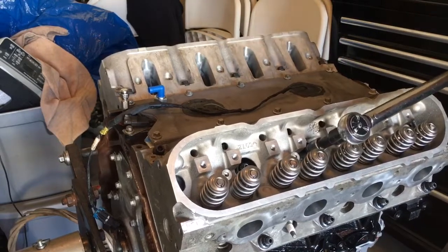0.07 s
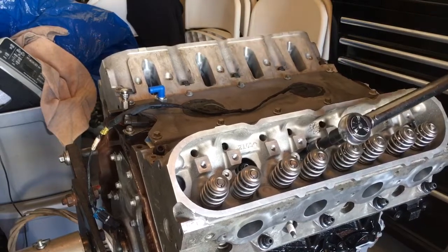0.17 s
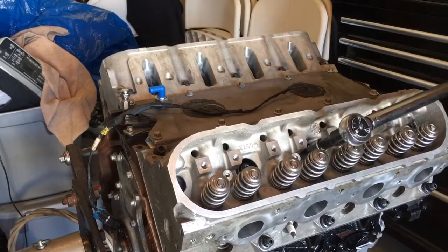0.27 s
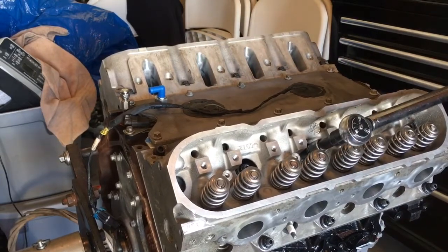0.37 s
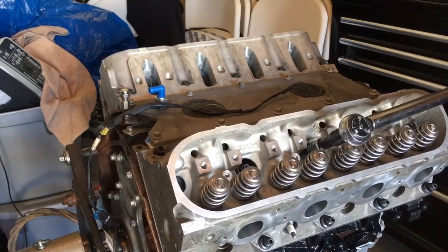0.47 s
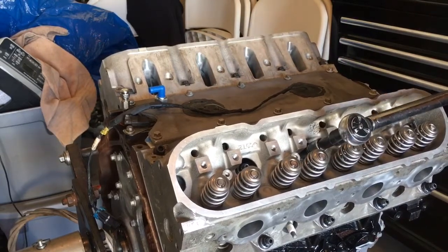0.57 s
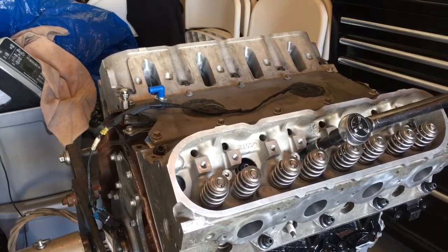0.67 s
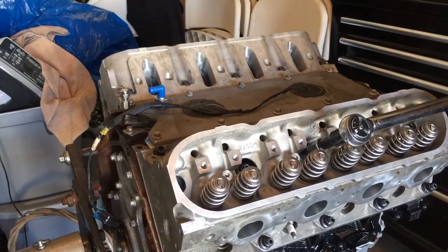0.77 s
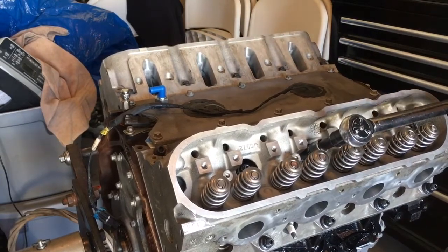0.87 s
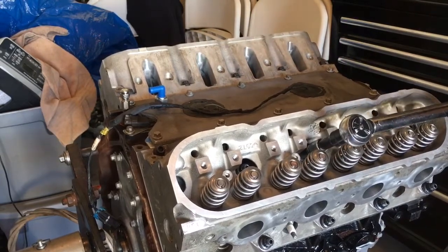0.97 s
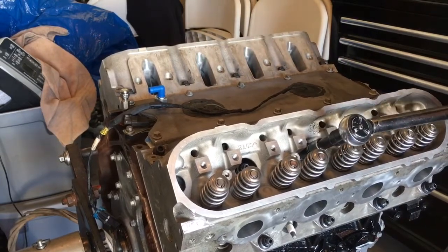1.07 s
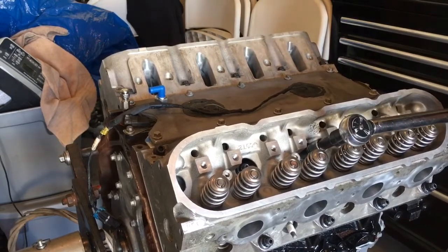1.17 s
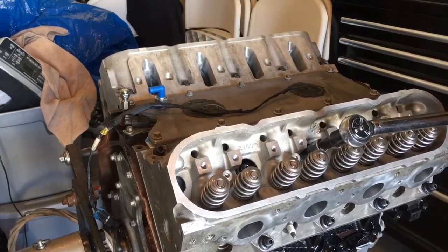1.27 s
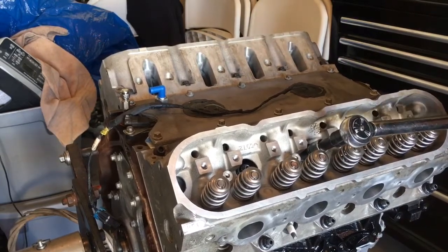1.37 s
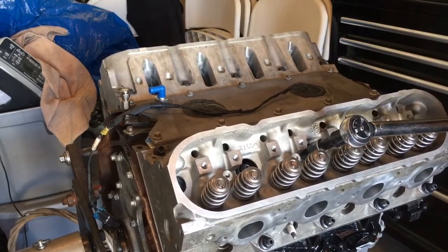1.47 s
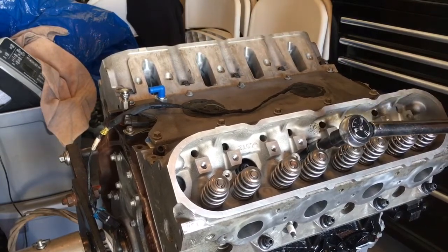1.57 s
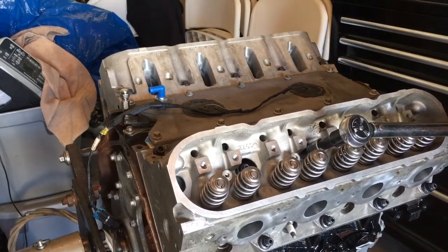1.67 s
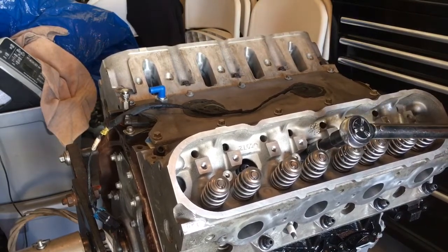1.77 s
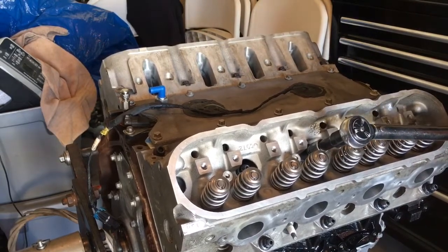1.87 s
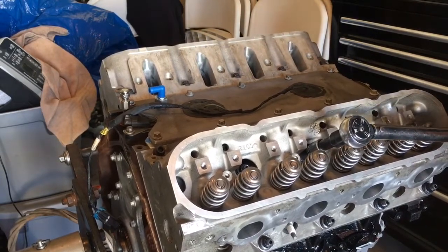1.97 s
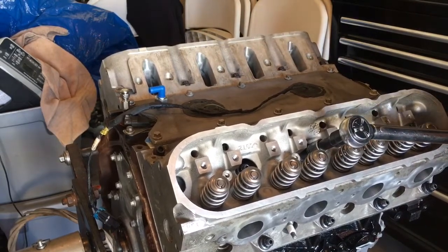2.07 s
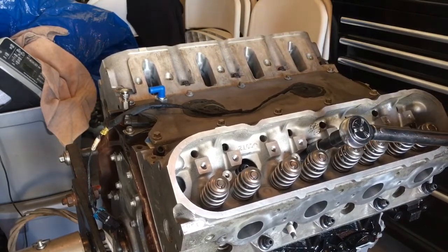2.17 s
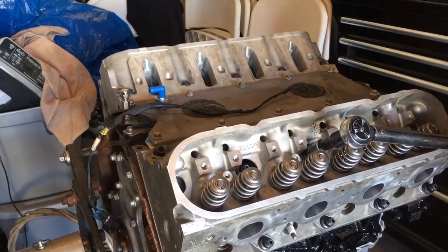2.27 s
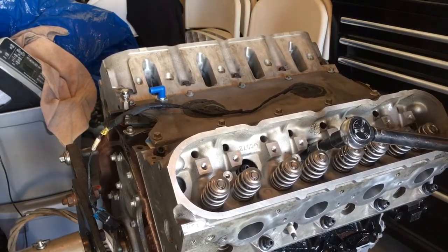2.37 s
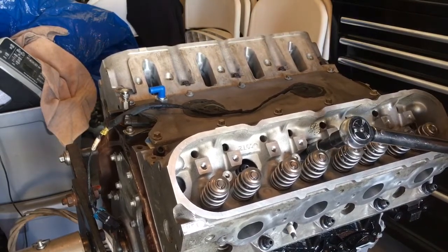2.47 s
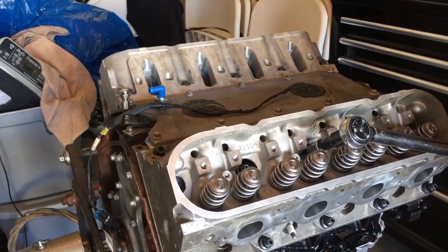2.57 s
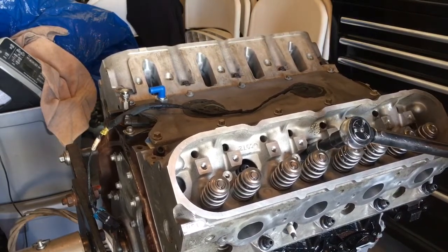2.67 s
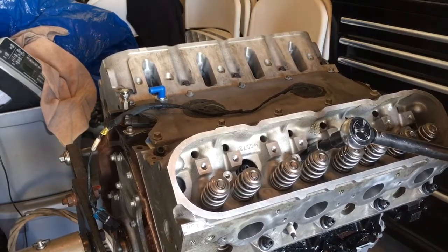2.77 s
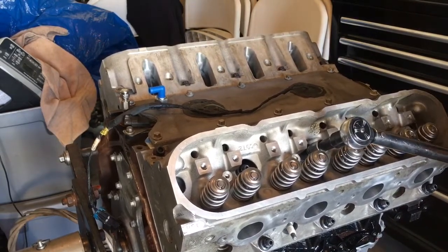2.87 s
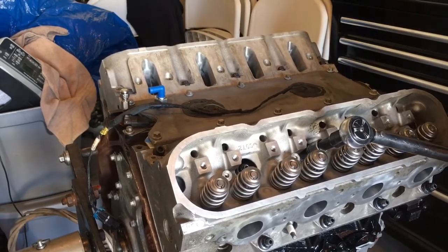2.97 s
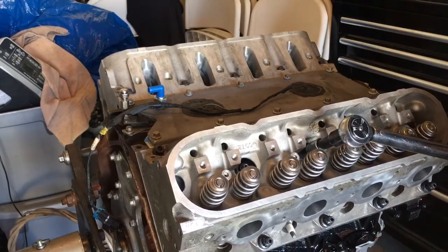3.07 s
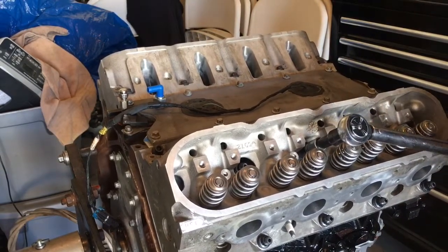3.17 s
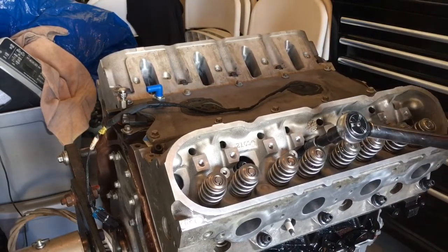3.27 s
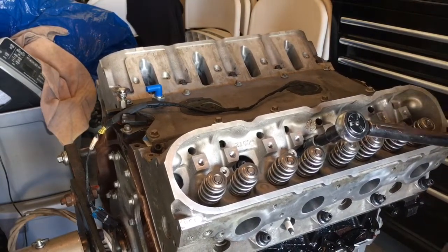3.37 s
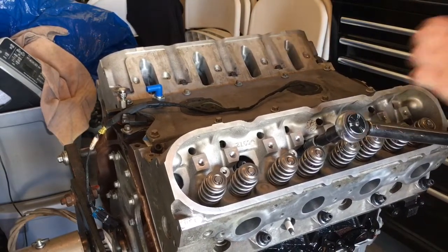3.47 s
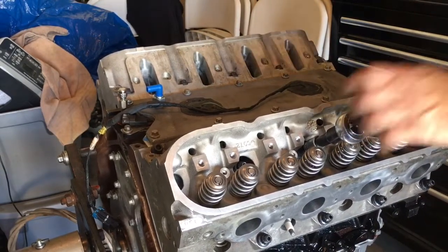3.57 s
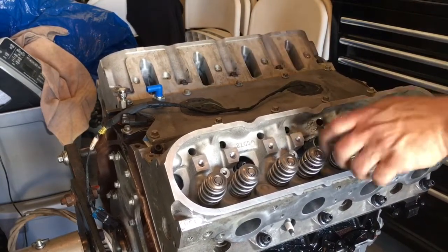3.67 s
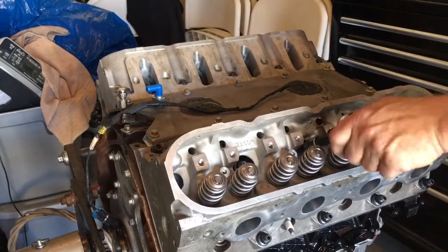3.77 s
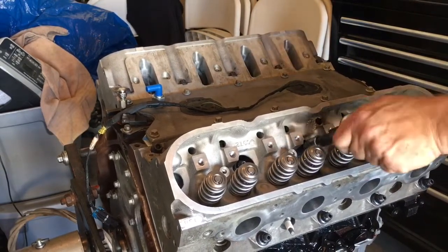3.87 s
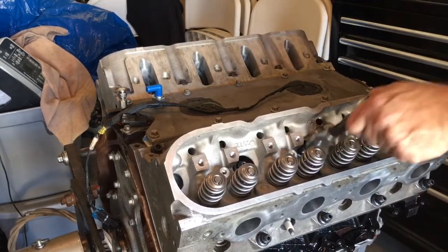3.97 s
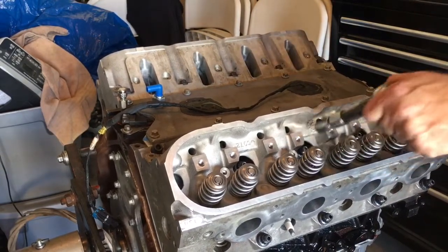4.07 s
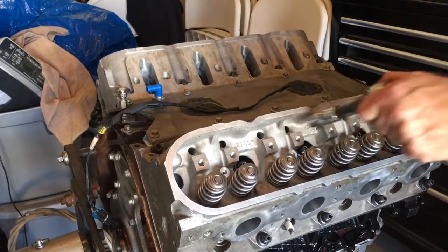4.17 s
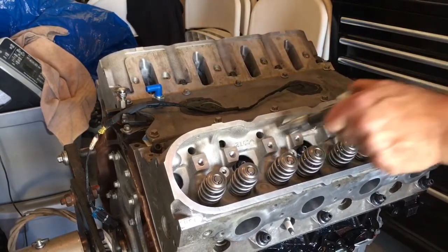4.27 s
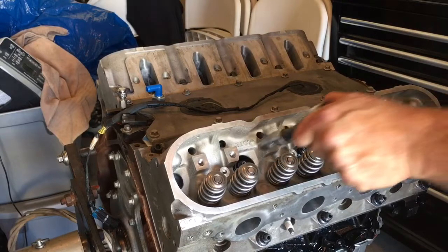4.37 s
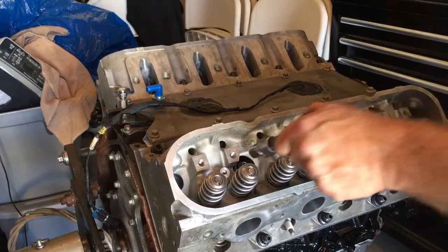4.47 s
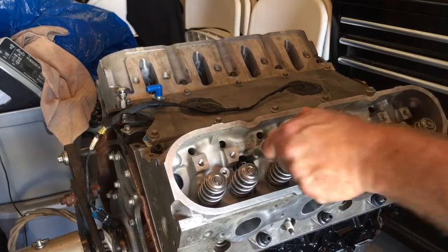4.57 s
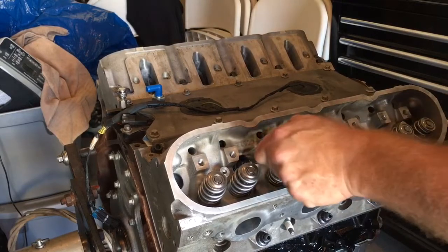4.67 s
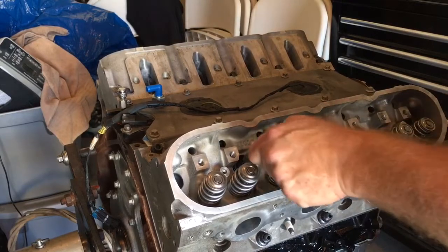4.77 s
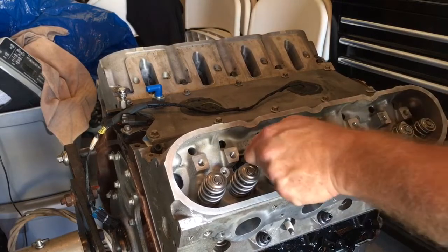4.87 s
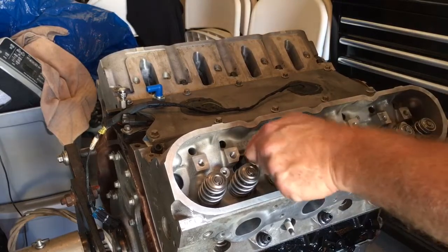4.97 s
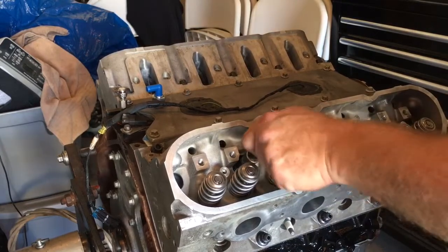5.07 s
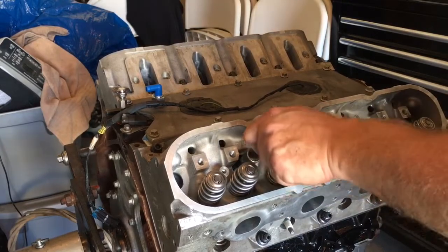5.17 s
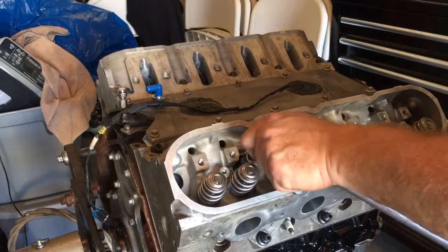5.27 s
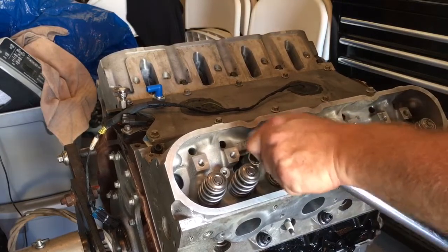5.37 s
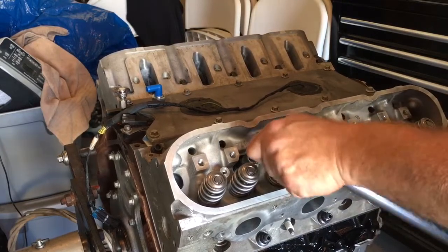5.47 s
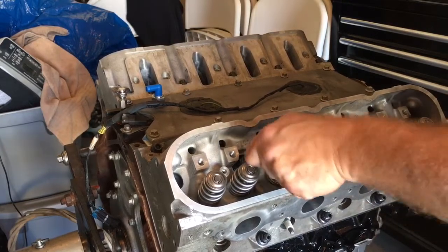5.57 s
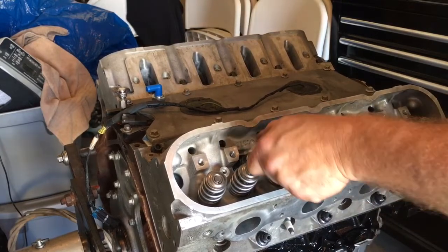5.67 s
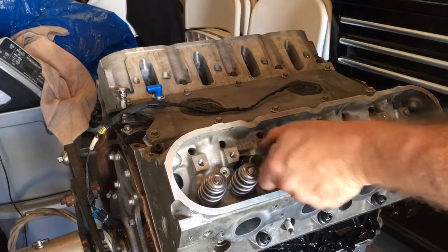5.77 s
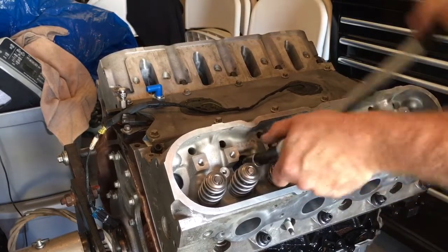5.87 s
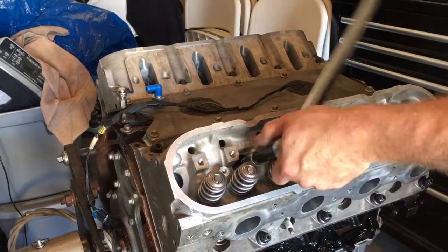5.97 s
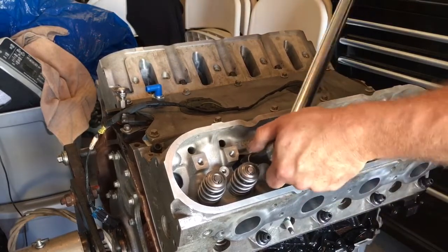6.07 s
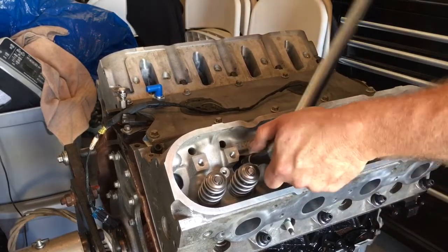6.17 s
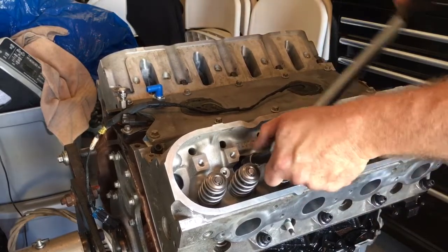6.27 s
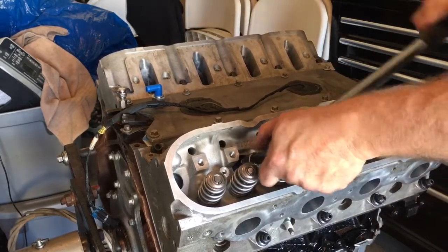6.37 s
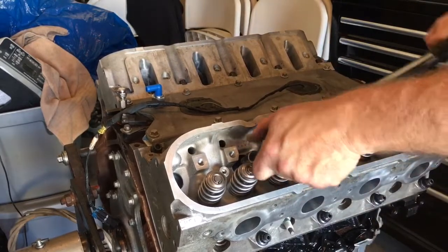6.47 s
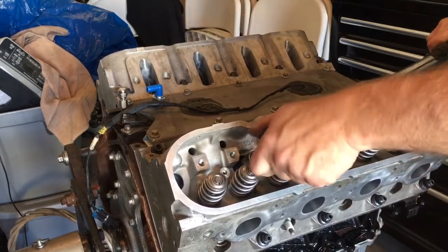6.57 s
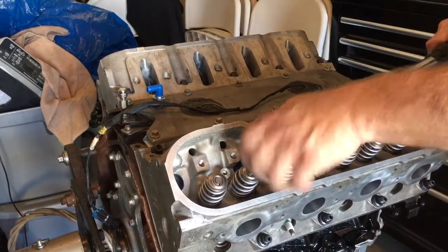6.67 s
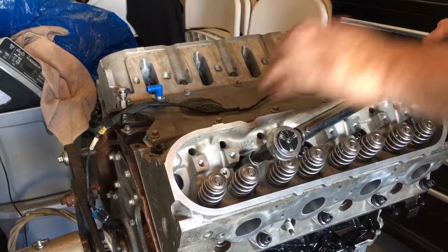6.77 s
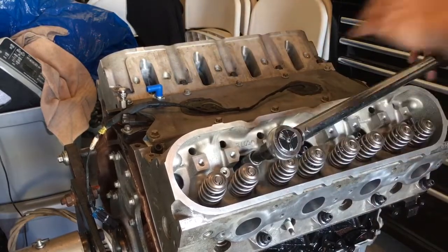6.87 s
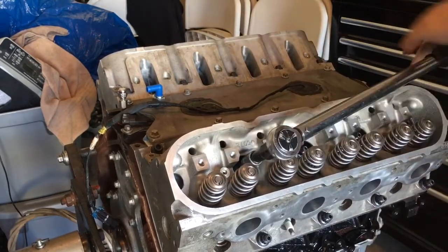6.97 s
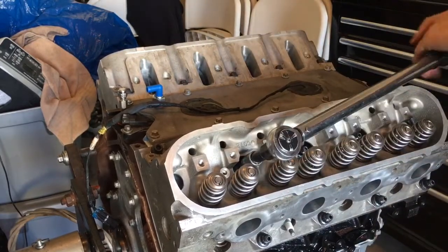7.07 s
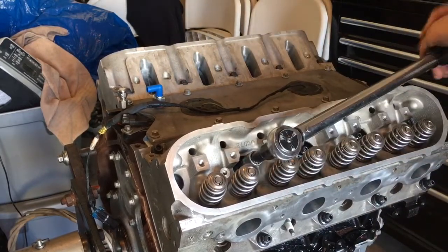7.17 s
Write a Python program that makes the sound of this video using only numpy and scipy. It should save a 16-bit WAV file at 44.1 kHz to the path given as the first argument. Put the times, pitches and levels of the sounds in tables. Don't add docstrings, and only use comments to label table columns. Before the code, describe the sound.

A low, slightly lumpy engine idle hums throughout with soft rumbling air, and a faint, very high insect buzz flickers in short bursts. Nothing else happens until 2.8 s, when a torque wrench breaks over with a very loud, sharp steel crack, ringing briefly in a small garage. At 3.2 s it snaps back, a little softer and duller. A thin hiss lingers, stopping at about 3.6 s. At 3.7 s comes a dull double knock; around 3.9-4.0 s small bright clinks and a light ring, with soft hand rubs. From 4.65 to 4.9 s the socket scrapes and ticks over metal, landing with a hard bright double clack at 4.95 s. A quieter tick falls at 5.55 s. Between 5.78 and 6.03 s seven crisp ratchet ticks run quickly, slowing slightly. Faint rubs and tiny taps follow until 6.6 s, then one clear clink at 7.16 s. Close phone microphone.

```python
import sys
import numpy as np
from scipy import signal
from scipy.fft import rfft, irfft, next_fast_len
from scipy.io import wavfile
from scipy.ndimage import uniform_filter1d, map_coordinates

SR = 44100
rng = np.random.default_rng(int(sys.argv[2]) if len(sys.argv) > 2 else 0)


def generate_wav(sig):
    pcm = np.round(np.clip(np.atleast_2d(sig).T, -1, 1) * 32767).astype(np.int16)
    wavfile.write(sys.argv[1], SR, pcm)


def gain_from_db(level_db):
    decades = np.asarray(level_db, float) / 20
    return 10 ** decades


N = 318402


def unit(x):
    return x / np.sqrt(np.mean(x ** 2) + 1e-20)


def along(points, hz):
    f, v = np.transpose(points)
    return np.interp(np.log(hz + 1), np.log(f + 1), v)


def wobble(rate):
    knots = rng.standard_normal(int(N * rate / SR) + 4)
    return map_coordinates(knots, [np.arange(N) * rate / SR])


def swell(start, top, end, soft):
    ramp = np.interp(np.arange(N) / SR, (start, top, max(end, top + .001)), (0, 1, 0))
    return np.sin(np.pi / 2 * ramp) ** soft


def filtered(x, response):
    m = next_fast_len(len(x) + 8192)
    spectrum = rfft(x, m) * response(np.fft.rfftfreq(m, 1 / SR))
    return irfft(spectrum, m)[:len(x)]


def resonance(centre_hz, width_hz):
    return lambda f: 1j * f * width_hz / (centre_hz ** 2 - f * f + 1j * f * width_hz)


def body(modes):
    return lambda f: sum((-1) ** k * gain_from_db(db) * resonance(hz, width)(f)
                         for k, (hz, width, db) in enumerate(modes))


def causal(points):
    def response(f):
        cep = irfft(np.log(gain_from_db(along(points, f)) + 1e-6))
        half = len(cep) // 2
        cep[1:half] *= 2
        cep[half + 1:] = 0
        return np.exp(rfft(cep))
    return response


LIFE = 17000


def blow(colour, rise, t60):
    t = np.arange(LIFE) / SR
    z = rfft((1 - np.exp(-t / rise)) * gain_from_db(-60 * t / t60) * rng.standard_normal(len(t)))
    even = irfft(z / uniform_filter1d(np.abs(z), size=110), len(t)) * (t < 2 * t60)
    x = filtered(even, colour)
    return x / np.abs(x).max()


def ringing(modes, rise, unsteady):
    t = np.arange(LIFE) / SR
    drift = unsteady * np.cumsum(rng.standard_normal((len(modes), LIFE)), axis=1)
    partials = sum(gain_from_db(db - 60 * t / t60) * np.sin(2 * np.pi * hz * t + d)
                   for (hz, db, t60), d in zip(modes, drift))
    return (1 - np.exp(-t / rise)) * partials


# [Hz, s]
GARAGE_DECAY = [(300, 0.55), (790, 0.36), (2090, 0.33), (5510, 0.34), (14600, 0.26)]
# [s, dB]
NEAR_WALLS = [(.0047, -13), (.0065, -17.5), (0.011, -12.5), (0.022, -21)]


def in_garage(x, colour, room_db, arrive=0.0047):
    hz, t, z = signal.stft(rng.standard_normal(len(x)), SR, nperseg=256)
    fading = z * gain_from_db(-60 * t / along(GARAGE_DECAY, hz)[:, None])
    tail = signal.istft(fading, SR, nperseg=256)[1][:len(x)]
    build_up = 1 - np.exp(-(np.arange(len(x)) / SR / arrive) ** 2)
    tail = filtered(tail * build_up, colour)
    out = x + gain_from_db(room_db) * tail * np.linalg.norm(x) / np.linalg.norm(tail)
    for delay, db in NEAR_WALLS:
        out += gain_from_db(db + room_db) * np.roll(x, round(delay * SR))
    return out


def add(track, s, x):
    track[round(s * SR):][:len(x)] += x


# [s, s, dB]
GATE_OPEN = [
    (2.8, 3.612, -66.5),
    (5.79, 7.4, -79),
    (3.4, 4.1, -78.5),
]


def hiss():
    t = np.arange(N) / SR
    gate = sum(gain_from_db(db) * np.interp(t, (start, start + .03, end - .008, end), (0, 1, 1, 0))
               for start, end, db in GATE_OPEN)
    return gate * unit(filtered(rng.standard_normal(N), resonance(6000, 9000)))


# [Hz, dB per Hz]
AIR_COLOUR = [(15, -33.5), (25, -1.5), (63, -9), (150, -9), (214, -21), (288, -21.5), (445, -30.5),
              (634, -33.5), (746, -37), (1900, -34), (2270, -40.5), (3510, -42), (9580, -57.5),
              (15200, -64), (16500, -73)]
# [Hz, Hz, dB]
FAN_DRONES = [(287, 100, -64), (628.5, 29, -73), (936, 190, -72.5), (2037, 54, -75), (3500, 310, -78)]


def air():
    z = signal.stft(rng.standard_normal(N), nperseg=512)[2]
    field = uniform_filter1d(uniform_filter1d(rng.standard_normal(z.shape), 6, 0), 14, 1)
    patchy = signal.istft(z * gain_from_db(0.98 * unit(field)), nperseg=512)[1][:N]
    rumble = unit(filtered(patchy, lambda hz: gain_from_db(along(AIR_COLOUR, hz))))
    drones = sum(gain_from_db(db + 0.47 * wobble(2.7))
                 * unit(filtered(rng.standard_normal(N), resonance(hz, width)))
                 for hz, width, db in FAN_DRONES)
    return gain_from_db(-51.0) * rumble + drones


SHAFT_HZ = 11.33
FIRING_DB, DOUBLE_DB, TRIPLE_DB = -48, -57.5, -56
LOPE_SHARE = .12
BEAT_S, BEAT_TOP_S, BEAT_DB = 1.15, .3, 3
# [s, dB]
FIRING_LOPE = [(0.0, -53.5), (0.18, -55.5), (1.63, -48.5), (2.43, -61.5), (2.53, -55), (2.87, -61.5),
               (3.7, -46), (4.28, -61), (5.51, -47.5), (5.77, -53), (5.89, -47), (6.11, -62.5),
               (6.25, -48.5), (6.6, -66), (6.66, -49), (7.22, -56)]
# [-, dB]
WEAK_ORDERS = [(6, -59.5), (7, -69.5), (9, -68), (10, -65), (11, -74), (15, -68.5), (25, -69.5)]


def engine():
    t = np.arange(N) / SR
    turn = 2 * np.pi * np.cumsum(SHAFT_HZ * (1 + 0.00406 * wobble(1.4))) / SR
    beat_db = BEAT_DB * np.cos(2 * np.pi * (t - BEAT_TOP_S) / BEAT_S)
    lope_db = np.interp(t, *np.transpose(FIRING_LOPE))
    follow_db = LOPE_SHARE * (lope_db - lope_db.mean())
    levels = FIRING_DB + follow_db, lope_db, DOUBLE_DB, TRIPLE_DB + beat_db + follow_db
    orders = list(zip((4, 5, 8, 12), levels)) + WEAK_ORDERS
    out = np.zeros(N)
    for k, db in orders:
        strength = np.sqrt(2) * gain_from_db(db + 2.3 * wobble(5.4))
        out += strength * np.sin(round(k) * turn + rng.uniform(0, 6.02) + 0.89 * wobble(3.5))
    return out


BURST_SOFT, WING_REST_DB = 0.49, -99
# [s, s, dB]
WING_BURSTS = [(.07, 0.13, -82), (0.356, 0.11, -81), (.62, .2, -81), (.85, .05, -89), (1.06, .07, -87),
               (1.22, 0.11, -81), (1.44, .13, -81), (1.69, 0.1, -80), (1.84, .06, -87), (1.92, .1, -80),
               (2.04, .13, -85), (2.26, 0.11, -80), (2.487, .13, -81), (2.737, 0.092, -81),
               (3.5, 0.16, -80), (3.81, 0.1, -77), (4.069, .11, -79), (4.298, 0.13, -79), (4.47, .1, -78),
               (5.078, .08, -79), (5.35, .14, -81), (5.63, 0.1, -80), (6.26, .08, -83), (6.405, .05, -82),
               (6.57, .075, -78), (6.78, .05, -85.5), (7.015, 0.081, -81)]


def insect():
    clicks = rng.standard_normal(N) * gain_from_db(3 * wobble(400))
    lower, upper = (unit(filtered(clicks, lambda f: resonance(hz, 520)(f) ** 2)) for hz in (9550, 9850))
    rise = np.clip(.5 + 0.68 * wobble(9.0), 0, 1)
    effort = gain_from_db(WING_REST_DB) + sum(gain_from_db(db + 0.5) * swell(s, s + .4 * length, s + length, BURST_SOFT)
                                     for s, length, db in WING_BURSTS)
    return effort * unit((1 - rise) * lower + rise * upper)


STROKE_SOFT = 2.2
# level_db of each of the four pitch regions, low to high [dB]
SKIN_COLOUR = (-4, 1.5, 0, -11)
# [s, s, s, dB, dB]
HAND_STROKES = [(3.513, 3.539, 3.7, -72, -2), (3.606, 3.687, 3.9, -86, -14), (3.83, 3.892, 4, -66, 1),
                (3.98, 4.027, 4.15, -70.5, -1), (4.167, 4.198, 4.32, -70.5, -3.5),
                (4.63, 4.664, 4.7, -70, -0.5), (4.7, 4.745, 4.9, -63, 4), (4.754, 4.797, 4.87, -59, -4),
                (4.735, 4.76, 4.8, -73, 2), (4.8, 4.816, 4.87, -81, 1), (4.837, 4.876, 5.03, -67.5, -1.5),
                (5.015, 5.052, 5.2, -73.5, -2), (5.195, 5.257, 4.5, -76, -5.5),
                (5.54, 5.555, 5.6, -67.5, -6.5), (5.624, 5.78, 6.6, -77.5, -5), (6.1, 6.137, 6.2, -65, 1),
                (6.356, 6.38, 6.46, -66, -2), (6.53, 6.559, 6.84, -72.5, -2), (6.64, 6.655, 6.68, -73, 0)]


def hand():
    def band(hz, share):
        grain = rng.standard_normal(N) * gain_from_db(1.2 * wobble(300) + 1.2 * wobble(60))
        return unit(filtered(grain, lambda f: resonance(hz, share * hz)(f) ** 2))
    regions = np.array([band(1120, 0.69), band(2260, 1.0), band(5100, 1.0), band(12000, 0.99)])
    place = np.arange(len(regions)) - (len(regions) - 1) / 2
    speed = np.array([swell(start, top, end, STROKE_SOFT) for start, top, end, _, _ in HAND_STROKES])
    gains = np.array([gain_from_db(db + np.array(SKIN_COLOUR) + bright_db * place)
                      for *_, db, bright_db in HAND_STROKES])
    return np.sum(regions * (gains.T @ speed), axis=0)


# [s, peak dB]
STAND_KNOCKS = [
    (3.7134, -39.5),
    (3.728, -40.5),
]


def thud():
    out, colour = np.zeros(N + SR), resonance(325, 130)
    for s, db in STAND_KNOCKS:
        add(out, s, gain_from_db(db) * in_garage(blow(colour, rise=.001, t60=0.034), colour, room_db=-13))
    return out[:N]


# [s, peak dB, Hz]
RIM_CATCHES = [(3.7135, -42, 1200), (3.72, -50, 1750), (3.729, -50, 1560), (4.7, -41, 3620),
               (4.717, -34, 3400), (4.7503, -49, 1630), (4.7593, -46, 1670), (4.77, -48, 1900),
               (4.7807, -47, 2600), (4.787, -48, 1500), (4.7935, -46, 1100), (4.7985, -48, 2200),
               (4.8052, -45.5, 1900), (4.8175, -47, 1800), (4.826, -50.5, 1400), (4.835, -49, 1900),
               (4.876, -42, 3100)]


def scuffs():
    out = np.zeros(N + SR)
    for s, db, hz in RIM_CATCHES:
        modes = [(hz, 0, .009), (1.9 * hz, -5, .005), (3.0 * hz, -9, .004)]
        add(out, s, gain_from_db(db - 2) * ringing(modes, rise=.0002, unsteady=0.092))
    return out[:N]


# [s, dB]
SOCKET_SEATS = [
    (3.9886, -51.5),
    (4.007, -61),
]
# [Hz, dB, s]
WALL_MODES = [(4400, 2, .025), (6000, -4, 0.18), (8200, 0, .13), (12200, -13, .08)]


def socket_wall():
    out = np.zeros(N + SR)
    for s, db in SOCKET_SEATS:
        add(out, s, gain_from_db(db) * ringing(WALL_MODES, rise=.0005, unsteady=.11))
    return out[:N]


BUILD_SHARE = .06
FUZZ = .4
# [s, Hz, dB, s]
FREE_PARTIALS = [(3.9337, 12000, -42, 0.01), (3.9472, 1490, -52, .022), (3.9729, 4300, -46, .01),
                 (3.9879, 5030, -42, 0.015), (4.0066, 4200, -42, .011), (4.6998, 4600, -46, .01),
                 (4.7135, 9200, -48, .015), (4.7162, 5900, -46, .01), (4.8754, 3200, -48, .01),
                 (4.8754, 5600, -46, .01), (5.7465, 5600, -62, .02), (7.16, 1900, -40, 0.027),
                 (7.159, 4400, -40.5, .025), (4.9522, 5660, -29, 0.015), (4.9588, 8650, -36, .02),
                 (4.9615, 6950, -40, .03), (4.961, 3450, -36.5, .03), (4.964, 6050, -45, .22),
                 (4.964, 5560, -49, 0.18), (4.964, 6800, -47, .2), (5.7828, 6600, -30, 0.014),
                 (5.7828, 9200, -38, .016), (5.7828, 6700, -50, .25), (5.8126, 6400, -40, .02),
                 (5.8126, 5500, -42, .02), (5.8126, 6280, -50, .25), (5.849, 6000, -45, .28),
                 (5.849, 8000, -31, 0.018), (5.849, 7080, -48, 0.2), (5.849, 6180, -41, .016),
                 (5.8857, 5750, -36, .02), (5.8856, 6070, -51, .28), (5.8852, 5160, -51, 0.18),
                 (5.8852, 8400, -37, 0.018), (5.8852, 7400, -51, 0.18), (5.9257, 5320, -47, 0.28),
                 (5.9258, 6500, -38, .018), (5.926, 4000, -47, 0.018), (5.9258, 5300, -38, .018),
                 (5.9258, 7600, -44, .016), (5.9705, 5660, -36, .02), (5.971, 5400, -58, .3),
                 (5.971, 7440, -52, 0.26), (5.971, 8200, -53, .3), (6.0327, 6400, -50, 0.3),
                 (6.0327, 8050, -50, .28), (6.033, 8860, -37, .018), (6.0327, 6400, -35, .02),
                 (6.0327, 8200, -35, .02)]


def chimes():
    out = np.zeros(N + SR)
    for s, hz, db, t60 in FREE_PARTIALS:
        rise = .0003 + BUILD_SHARE * max(t60 - .045, 0)
        add(out, s, ringing([(hz, db, t60)], rise, unsteady=0.038 + FUZZ * t60))
    return out[:N]


PING_WIDTH, CLINK_WIDTH, KNOCK_WIDTH = 0.78, 1.6, 4.7
# start_s, level_db, pitch_hz, room_db, thud_db [s, peak dB, Hz, dB, dB] # narrow pings of the
SOCKET_PINGS = [(3.179, -51.5, 5310, -6, -31), (3.6645, -63, 7480, -6, -30), (3.714, -44.5, 704, 5, -20),
                (3.9472, -41.5, 1660, -15, -5), (3.9655, -43, 6500, -1, -10), (3.9729, -44, 4200, -4, -8),
                (3.982, -44, 3000, 5, -10), (3.9879, -35.5, 5000, -4, -6), (4.6995, -39.5, 3960, 9.5, 2),
                (4.7162, -36, 6000, -5, -15), (4.8754, -42, 4300, -3, -20), (4.709, -35.5, 3540, -6, -15),
                (4.7135, -41, 9200, 2, -20), (4.759, -44, 1700, -4, -15), (4.817, -47, 7200, -2, -20),
                (4.886, -54, 8000, -2.5, -19.5), (6.386, -47.5, 5500, 2, -20), (6.3885, -53, 2800, -2, -20),
                (6.428, -51, 2200, -4, -20), (6.565, -56, 4500, -4, -15), (6.34, -57, 4500, -5.5, -12),
                (7.1604, -39.5, 2123, 2, -25)]
BOLT_CLINKS = [(2.768, -52, 10950, -6.5, -35), (3.648, -56, 6500, -10, -19.5), (3.9337, -33, 9900, -4, -4),
               (3.9447, -36, 11100, 3.5, 7), (4.0065, -43, 9000, -8, 2), (4.1965, -53.5, 4500, 7, -5),
               (4.6545, -52.5, 8000, 11, 0), (4.9522, -27.5, 6550, 4, -11), (4.9585, -21, 6400, -11, -20),
               (5.551, -43.5, 4970, 0.5, -6), (5.979, -41, 3400, 1, 5), (6.3684, -54.5, 6030, 14, -6),
               (6.5487, -56, 4500, -3, -4), (6.5974, -53, 3500, -1, -4), (7.16, -30.5, 5200, -3, -1)]
CASTING_KNOCKS = [
    (3.7124, -56, 6000, 16, -3),
    (3.7267, -40.5, 6000, 1, 11),
    (4.706, -36, 9000, 1, -17),
    (4.9606, -22.5, 5300, 0, -0.5),
]
# [Hz, Hz, dB]
SOCKET_MODES = [(1710, 240, -0.5), (3400, 416, 2.5), (4500, 540, 0.5), (5680, 300, 3.5), (6600, 350, 2),
                (8400, 210, 2.5), (9640, 350, 1), (12000, 550, -3), (14170, 500, -8.5)]
# [s, s, Hz, dB]
SLIP_SQUEAKS = [
    (3.965, 4.042, 15760, -62),
    (4.0, 4.09, 15200, -80),
    (2.779, 2.792, 3050, -59),
    (4.875, 4.9, 15180, -62),
    (4.915, 4.94, 15180, -76),
]


def socket():
    out, t = np.zeros(N + SR), np.arange(N) / SR
    socket_body = body(SOCKET_MODES)
    casting = resonance(1500, 2000)
    kinds = (SOCKET_PINGS, PING_WIDTH), (BOLT_CLINKS, CLINK_WIDTH), (CASTING_KNOCKS, KNOCK_WIDTH)
    for contacts, width in kinds:
        for s, db, hz, room_db, thud_db in contacts:
            def colour(f):
                steel = resonance(hz, width * hz)(f) ** 3 * (0.37 + np.abs(socket_body(f)))
                return steel - gain_from_db(thud_db - 1.0) * casting(f) ** 2
            touch = blow(colour, rise=0.0003, t60=.0075)
            add(out, s, gain_from_db(db) * in_garage(touch, colour, room_db - 3.0, arrive=0.0045))
    flutter, waver = wobble(60), wobble(80)
    for start, end, hz, db in SLIP_SQUEAKS:
        strength = gain_from_db(db + 1.5 * flutter) * swell(start, (start + end) / 2, end, soft=.31)
        out[:N] += strength * np.sin(2 * np.pi * hz * t + .8 * waver)
    return out[:N]


TOOTH_ECHO_S, TOOTH_ECHO_DB = .0018, -3.5
# [s, peak dB, Hz, dB, dB]
RATCHET_TEETH = [
    (5.7463, -60, 4700, -2, -4),
    (5.7827, -30.5, 6640, -1, -13),
    (5.813, -33.5, 6000, -2.5, 0),
    (5.849, -27.5, 6150, 1, -3),
    (5.885, -33, 5700, 2.5, 0),
    (5.9257, -33.5, 5300, 3, 5),
    (5.9706, -33.5, 5700, 2.5, 7),
    (6.033, -31, 6300, 2, 14),
]
# [-, -, dB]
PAWL_MODES = [(1, 0.067, 13.5), (.9, 0.028, -12.5), (1.12, .04, -4.5), (1.41, 0.036, 2), (.62, 0.039, -8),
              (1.84, .035, -3)]
# [Hz, Hz, dB]
HEAD_MODES = [(1780, 290, 6), (4000, 340, 0), (5200, 250, 0.5), (5700, 150, 0), (6400, 350, 1),
              (7200, 200, 3), (8000, 350, 2.5), (9000, 270, 0), (9500, 240, -1), (11930, 350, -3),
              (13250, 350, 1), (14200, 280, -18)]


def ratchet():
    out = np.zeros(N + SR)
    head = body(HEAD_MODES)
    for s, db, hz, room_db, head_db in RATCHET_TEETH:
        pawl = body([(k * hz, share * hz, level) for k, share, level in PAWL_MODES])

        def colour(f):
            parts = gain_from_db(-24) + np.abs(pawl(f)) + gain_from_db(head_db) * np.abs(head(f))
            return resonance(7000, 16000)(f) * parts
        tick = blow(colour, rise=0.0004, t60=0.0073)
        tooth = tick + gain_from_db(TOOTH_ECHO_DB) * np.roll(tick, round(TOOTH_ECHO_S * SR))
        add(out, s, gain_from_db(db + 1.0) * in_garage(tooth, colour, room_db - 4.5, arrive=0.0057))
    return out[:N]


BETWEEN, RING_DB = .55, -23.5
# [s, peak dB, dB]
WRENCH_CLICKS = [
    (2.7913, -2.5, -1),
    (3.2021, -5.5, -0.5),
]
# [s, dB]
PAWL_REBOUNDS = [
    (.0043, -7.5),
    (.0062, -19.5),
]
# [Hz, dB, s]
BREAK_RING = [(1770, -9, 0.25), (2206, -9.5, 0.22), (2370, -1, 0.14), (3350, -8.5, 0.25), (4360, -4, .26),
              (4470, -3.5, .33), (4560, 0, 0.18), (4500, -8, 0.22), (5300, -9, 0.3), (7160, -6, 0.3),
              (8400, -9.5, 0.2), (10820, -3, 0.24), (13100, -10.5, .22), (13830, -15.5, .25)]
SNAP_RING = [(740, -19.5, 0.25), (1610, -9, .3), (1700, -4, 0.34), (1736, -9.5, 0.3), (2200, -7, 0.25),
             (3470, -2, 0.15), (5410, 34.5, 0.0061), (5185, -9, .24), (6080, -14, 0.2), (6600, -7, 0.23),
             (9610, -11.5, .2), (10800, -2.5, 0.199), (11200, -5, 0.15)]
# [Hz, dB per Hz]
BREAK_COLOUR = [(150, -46.5), (250, -21.5), (1550, -4), (2530, -5), (2910, -4), (4340, -3), (5540, -0.5),
                (6140, -5), (6700, -5.5), (8260, 3.5), (10400, -11), (12500, 0), (16000, -22)]
SNAP_COLOUR = [(150, -37.5), (250, -23.5), (988, -16.5), (1580, -12), (2440, -6.5), (3060, -18),
               (3400, -10.5), (4570, -8.5), (5440, -6.5), (7310, -17.5), (11300, -10.5), (13700, -29.5),
               (16000, -30.5)]
# [Hz, dB per Hz]
BREAK_ROOM = [(120, -46.5), (200, -12), (269, -34), (323, -7.5), (403, -21.5), (739, -4.5), (992, -18.5),
              (1630, -7), (1930, -12.5), (2190, -2.5), (4490, -9), (5600, -9), (12600, -9), (16300, -14.5)]
SNAP_ROOM = [(120, -46), (200, -19), (329, -8.5), (425, -29), (638, -6.5), (992, -17), (1410, -12.5),
             (1600, -8.5), (2300, -12), (2950, -13), (3410, -13.5), (5300, -12.5), (10300, -17.5),
             (11600, -17.5), (16300, -32.5)]
# [Hz, Hz, dB]
TUBE_LOADED = [(1670, 120, 2.5), (2200, 120, -0.5), (2470, 170, -2.5), (3400, 190, 3.5), (4500, 350, 5.5),
               (5273, 200, -1), (6060, 200, -3), (6780, 350, 0.5), (8250, 450, -2.5), (9600, 350, -4.5),
               (11300, 270, -0.5), (12460, 450, 2.5)]
TUBE_FREE = [(1630, 160, 4), (2226, 250, 1.5), (2700, 260, -3.5), (3450, 153, 2), (4000, 300, -0.5),
             (5200, 370, 2), (6070, 151.3, -4), (6550, 250, 0.5), (7200, 200, -4.5), (9590, 350, -10),
             (10800, 200.4, 3.5), (12530, 450, -9)]


def wrench():
    out = np.zeros(N + SR)
    parts = ((BREAK_RING, BREAK_COLOUR, BREAK_ROOM, TUBE_LOADED),
             (SNAP_RING, SNAP_COLOUR, SNAP_ROOM, TUBE_FREE))
    for click, rebound, (modes, colour, tail, tube) in zip(WRENCH_CLICKS, PAWL_REBOUNDS, parts):
        s, db, room_db = click
        again, again_db = rebound

        def banded(f):
            return gain_from_db(along(tail, f)) * (BETWEEN + np.abs(body(tube)(f)))
        hit = blow(causal(colour), rise=0.0007, t60=0.015)
        both = hit + gain_from_db(again_db) * np.roll(hit, round(again * SR))
        crack = in_garage(both, banded, room_db)
        ring = gain_from_db(RING_DB) * ringing(modes, rise=0.0007, unsteady=0.064)
        add(out, s, gain_from_db(db) * (crack + ring))
    return out[:N]


def scene():
    background = hiss() + air() + engine() + insect()
    handling = hand() + thud() + scuffs() + socket_wall() + chimes() + socket()
    return (background + handling + ratchet() + wrench())[None]


def top_cut(x):
    return signal.sosfilt(signal.butter(12, 16790, fs=SR, output="sos"), x)


def record(dry):
    cut = signal.butter(7, 39, "high", fs=SR, output="sos")
    top = signal.butter(30, 15950, fs=SR, output="sos")
    mix = signal.sosfilt(top, signal.sosfilt(cut, dry))
    return top_cut(mix)


dry = scene()
out = record(dry)
generate_wav(out)
```